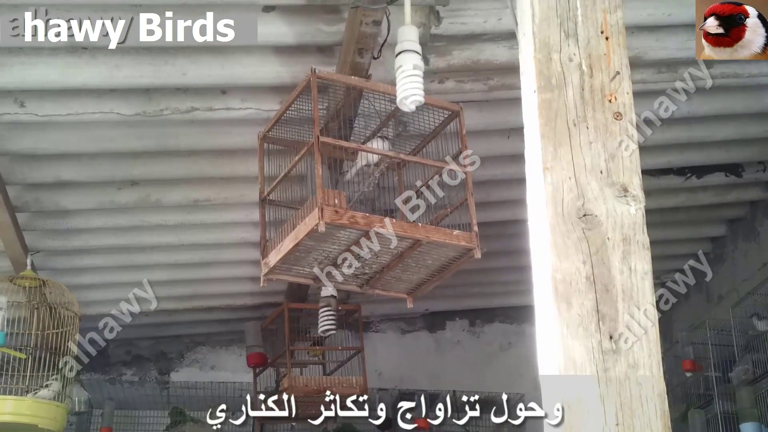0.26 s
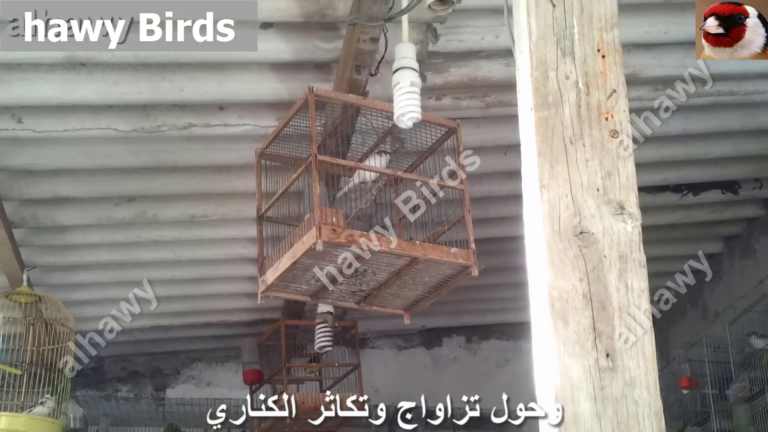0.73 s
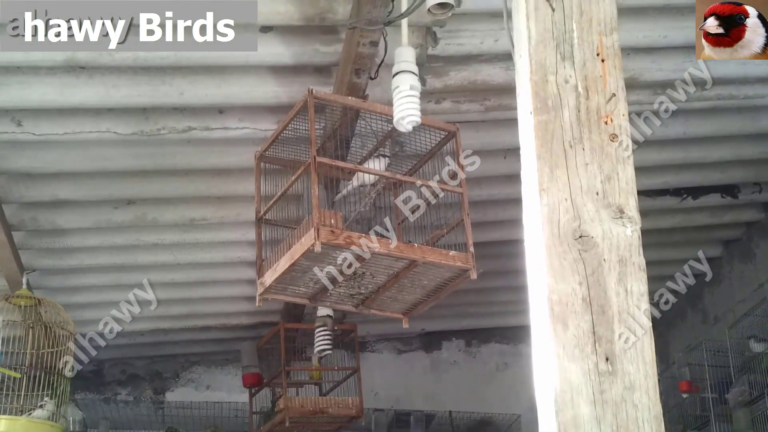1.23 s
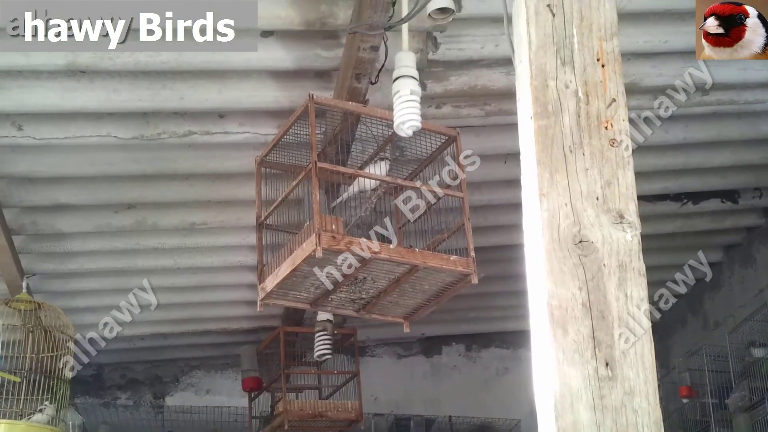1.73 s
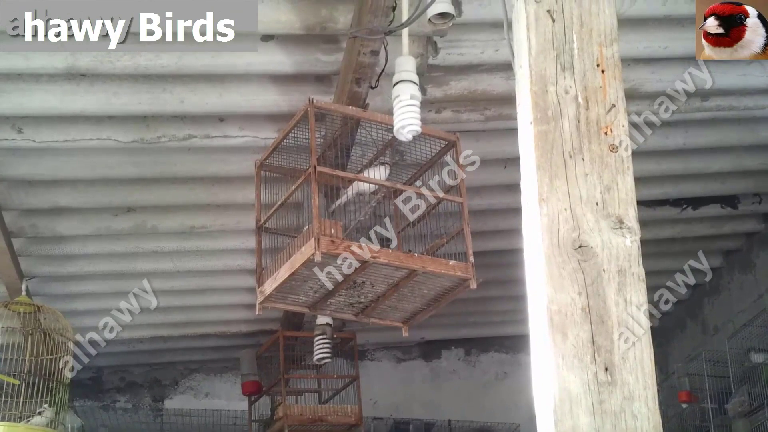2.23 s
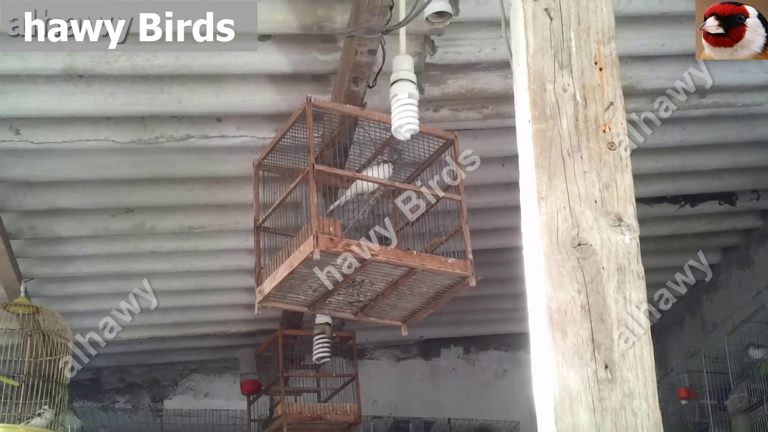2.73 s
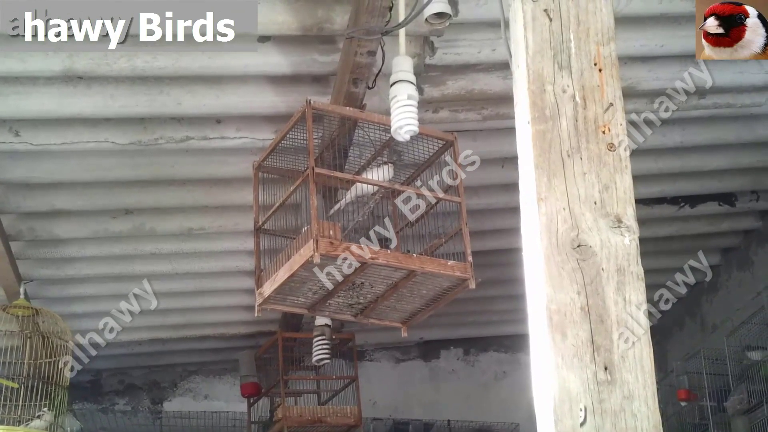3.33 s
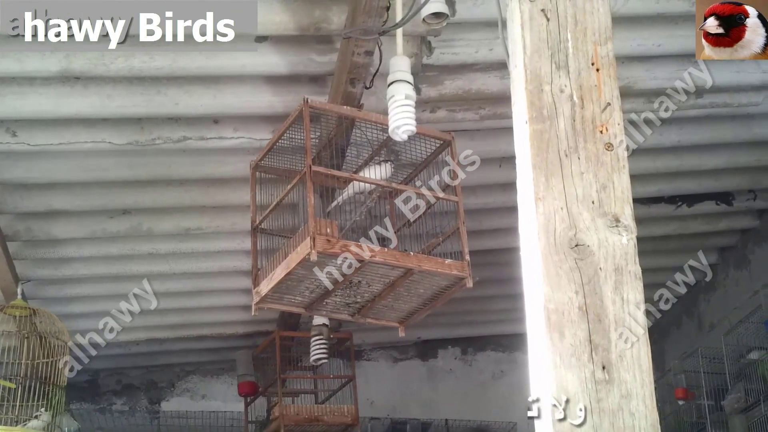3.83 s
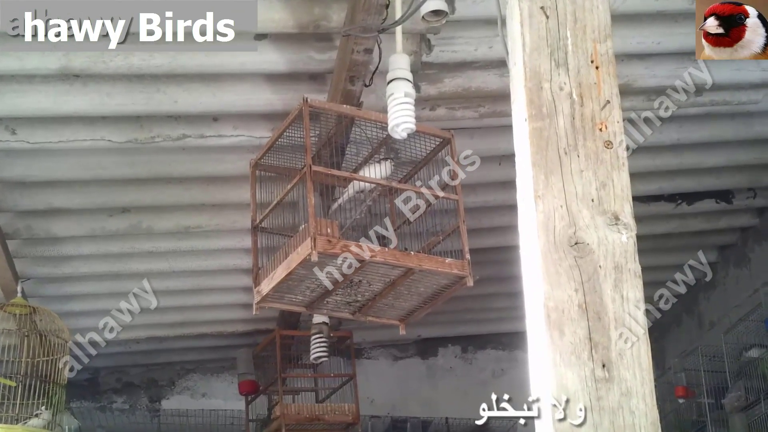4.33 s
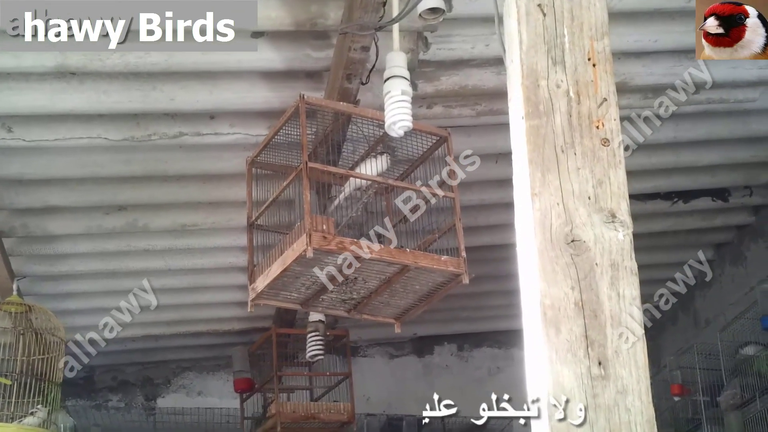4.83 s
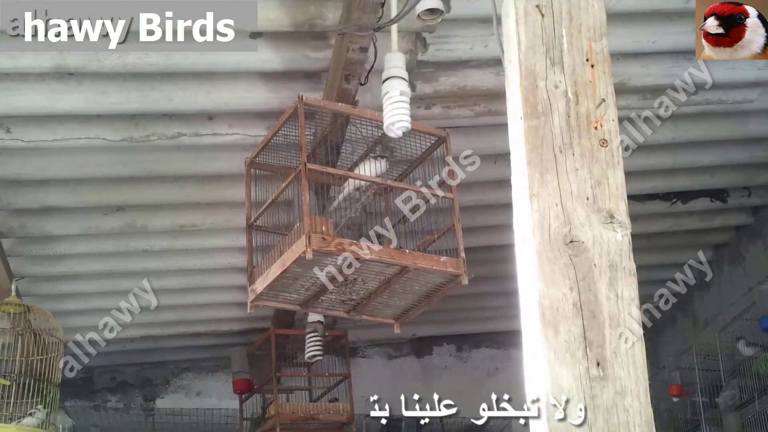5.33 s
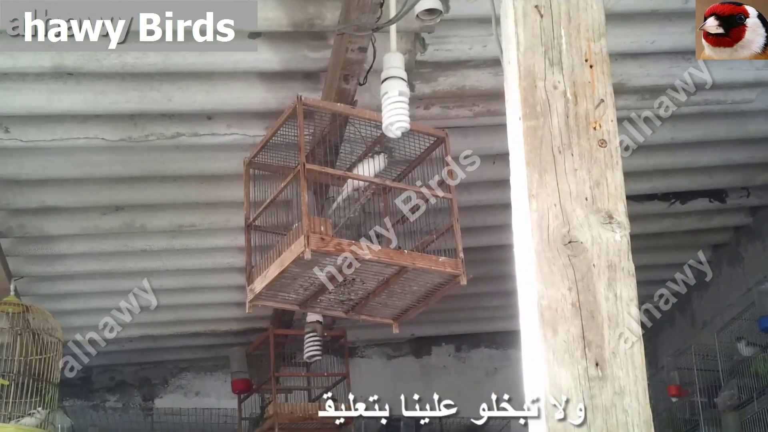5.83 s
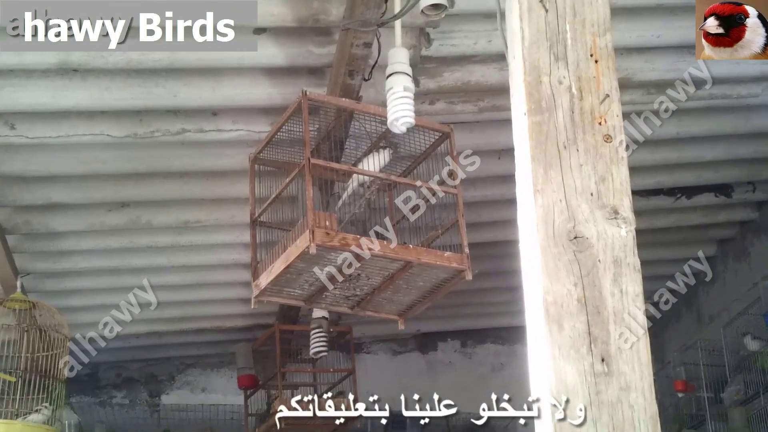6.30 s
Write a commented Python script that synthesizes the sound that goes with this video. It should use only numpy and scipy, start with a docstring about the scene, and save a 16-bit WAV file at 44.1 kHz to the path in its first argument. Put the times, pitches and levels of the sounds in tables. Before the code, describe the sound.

A caged canary sings rapid rolling trills, pauses, then builds to a loud long trill and bright whistles over low hum and faint distant chirps.

```python
"""Under a corrugated roof, a caged canary sings five trills, a run of falling notes and a few whistles.
Each syllable is a gliding, nearly pure tone; roof and posts add discrete echoes and a decaying tail.
Other birds chirp as one or two gliding tones, and noise bursts are their hops on the cage wire.
Coloured noise makes a swelling low hum, a wavering rumble and a faint flickering hiss."""
import sys
import numpy as np
from scipy import signal
from scipy.fft import rfft, irfft
from scipy.io import wavfile
from scipy.ndimage import uniform_filter1d

SR = 44100
rng = np.random.default_rng(int(sys.argv[2]) if len(sys.argv) > 2 else 0)


def materialize(psi):
    """Save the field psi as 16-bit PCM at rate SR to the path in sys.argv[1].

    A 1-D psi becomes a single channel; in a 2-D psi each row is a channel.
    """
    bounded = np.clip(np.atleast_2d(psi).T, -1, 1)
    quanta = np.round(bounded * 32767).astype(np.int16)
    wavfile.write(sys.argv[1], SR, quanta)


N = 289296  # samples


def undb(db):
    """Level law: 20 dB is a tenfold amplitude."""
    return 10 ** (np.asarray(db) / 20)


def sides(pan_db):
    """Intensity panning: left and right gains that differ by pan_db."""
    return undb(np.array([[pan_db], [-pan_db]]) / 2)


def add(track, s, sound):
    """Superposition: mix a sound in at s seconds, cut to the track."""
    i = round(s * SR)
    a, b = max(i, 0), min(i + sound.shape[-1], track.shape[-1])
    track[..., a:b] += sound[..., a - i:b - i]


def curve(points):
    """Linear interpolation of (seconds, value) rows over the whole scene."""
    return np.interp(np.arange(N) / SR, *np.transpose(points))


def walk(rate):
    """Slow random modulation: levels held 1 / rate s and slewed twice; spread near 1."""
    k = int(SR / rate)
    held = np.repeat(rng.standard_normal(200), k)[:N]
    return 1.3 * uniform_filter1d(uniform_filter1d(held, k), k)


def flutter(parts):
    """Random modulation: a gain near 1, shaken by low-passed noise, spreads noise around a tone."""
    gain = np.ones(N)
    for db, top_hz in parts:
        low_pass = signal.butter(2, top_hz, fs=SR, output="sos")
        shake = signal.sosfilt(low_pass, rng.standard_normal(N))
        gain = gain + undb(db) * shake / np.std(shake)
    return gain


# Likeness of the two channels in background noise. Each row: frequency in Hz, left-right correlation.
LIKENESS = [(30, .7), (70, .88), (180, .98), (350, .92), (600, .8), (1000, .4), (2000, .1), (4000, .02)]
LEFT_LAG_MS = .2


def noise(spectrum, db):
    """Partial coherence: coloured noise alike in the bass, unrelated in the treble, and later on the left."""
    hz = np.arange(1, N // 2 + 2) * SR / N
    colour_hz, colour_db = np.transpose(spectrum)
    gain = undb(np.interp(np.log(hz), np.log(colour_hz), colour_db, -200, -200))
    like_hz, like = np.transpose(LIKENESS)
    like = np.clip(np.interp(np.log(hz), np.log(like_hz), like), 0, 1)
    mid, side = rfft(rng.standard_normal((2, N))) * gain * np.sqrt([1 + like, 1 - like])
    lag = np.exp(-2j * np.pi * hz * LEFT_LAG_MS / 1000)
    out = irfft(np.array([(mid + side) * lag, mid - side]), N)
    return out * undb(db) / np.sqrt(np.mean(out.mean(axis=0) ** 2))


# Colour of the hiss. Each row: frequency in Hz, relative density in dB per Hz.
HISS = [(700, 0.5), (1100, 6), (2000, 1), (4200, 2.5), (6500, -5), (10000, -4.5), (14000, -4.5),
        (15500, -19.5)]
HISS_DB = -68.5  # before its flicker


def hiss():
    """Broadband noise: a faint hiss whose level flickers at random."""
    return noise(HISS, HISS_DB) * undb(0.6 * walk(10.0))


# Course of the rumble. Each row: time in seconds, level in dB before the waver.
RUMBLE = [(0, -75), (.6, -76), (.9, -81), (3.2, -79), (3.8, -72), (5.2, -75), (6.56, -74)]
# Colour of the rumble. Each row: frequency in Hz, relative density in dB per Hz.
RUMBLE_COLOUR = [(15, -16), (30, 2), (50, 0), (70, -8), (100, -35)]
RUMBLE_WAVER_DB = 2


def rumble():
    """Narrow-band noise: a deep rumble that rises, falls and wavers."""
    level_db = curve(RUMBLE) + RUMBLE_WAVER_DB * walk(2.9)
    return noise(RUMBLE_COLOUR, 0) * sides(1.7) * undb(level_db)


# Colour of the hum. Each row: frequency in Hz, relative density in dB per Hz.
HUM = [(45, -42), (65, -22.5), (100, -13.5), (140, -12), (180, -0.5), (224, 2.5), (374, -12.5), (432, -11),
       (550, -19), (654, -19), (856, -30.5), (1100, -41.5), (1430, -86), (2420, -120)]
# Slow swells of the hum. Each row: time in seconds, level in dB, relative level of its upper part in dB.
HUM_SWELL = [(0, -47.5, 2), (1, -42, -3.5), (2.2, -43, 2), (2.8, -41.5, -4.5), (3.2, -43, 1.5),
             (3.802, -42.5, -2.5), (5.702, -43, -4.5), (6.56, -44, -1.5)]
HUM_UPPER_HZ, HUM_PAN_DB = 330, 3


def hum():
    """Band splitting: low coloured noise, nearer the left, whose upper part swells on its own."""
    whole = noise(HUM, 0) * sides(HUM_PAN_DB)
    high_pass = signal.butter(2, HUM_UPPER_HZ, "high", fs=SR, output="sos")
    upper = signal.sosfiltfilt(high_pass, whole)
    times, level_db, upper_db = np.transpose(HUM_SWELL)
    upper_gain = undb(curve(np.transpose([times, upper_db])))
    return (whole - upper + upper * upper_gain) * undb(curve(np.transpose([times, level_db])))


# Hops and wing beats on the cage wire.
# Each row: start in seconds, length in seconds, level in dB before the band filter, centre in Hz.
RUSTLES = [(1.114, 0.0056, -47.5, 7000), (1.562, 0.033, -54, 9000), (1.9, 0.057, -48.5, 5230),
           (2.018, .0014, -66, 5000), (2.474, 0.026, -50.5, 8740), (6.456, 0.032, -48, 9000)]


def hops():
    """Impact noise: each hop or wing beat on the wire is a short burst of band-passed noise."""
    out, air = np.zeros((2, N)), rng.standard_normal(N)
    for s, length, db, hz in RUSTLES:
        size = int(length * SR)
        burst = air[int(s * SR):][:size] * np.hanning(size) ** .5
        edges_hz = [hz / 3, min(1.4 * hz, .45 * SR)]
        band = signal.butter(1, edges_hz, "band", fs=SR, output="sos")
        add(out, s, undb(db) * signal.sosfilt(band, burst))
    return out


OVERTONE_JITTER_TIMES = 3.5  # exponent on the pitch jitter, so the overtones waver more


def glide(length, start_hz, end_hz, bend, attack, overtones_db, warble_hz=0., throat_hz=0.,
          throat_width_hz=np.inf, release=0.2, jitter=None):
    """Source and filter: a syrinx tone slides towards end_hz; the throat favours pitches near its resonance."""
    u = np.arange(int(length * SR)) / (length * SR)  # share of the note elapsed
    hz = end_hz + (start_hz - end_hz) * np.exp(-u / bend)
    hz = hz + warble_hz * np.sin(2 * np.pi * 90 * length * u)  # 90 times a second
    jitter = 1 if jitter is None else jitter[:len(u)]
    phase = 2 * np.pi * np.cumsum(hz * jitter) / SR
    hoarse_phase = 2 * np.pi * np.cumsum(hz * jitter ** OVERTONE_JITTER_TIMES) / SR
    ramp = np.clip(np.minimum(u / attack, (1 - u) / release), 0, 1)
    swell = np.sin(np.pi / 2 * ramp) ** 2
    throat = 1 / np.sqrt(1 + ((hz - throat_hz) / throat_width_hz) ** 4)
    overtones = sum(undb(db) * np.sin(k * hoarse_phase) for k, db in enumerate(overtones_db, 2))
    return np.sqrt(2) * swell * (throat * np.sin(phase) + np.sqrt(throat) * overtones)


FLOCK_COUNT, FLOCK_DB, FLOCK_SPREAD_DB = 120, -78, 3  # spread either way
FLOCK_LOW_HZ, FLOCK_HIGH_HZ = 2540, 5160  # range of starting pitches


def flock():
    """Random scattering: peep rows for birds at the far end of the room, spread in time and pitch."""
    when, length, pitch, fall, level, pan = rng.random((FLOCK_COUNT, 6)).T
    hz = FLOCK_LOW_HZ + (FLOCK_HIGH_HZ - FLOCK_LOW_HZ) * pitch
    level_db = FLOCK_DB + FLOCK_SPREAD_DB * (2 * level - 1)
    rows = [when * N / SR, 0.0684 + 0.032 * length, hz, hz * (1 - 0.46 * fall), level_db, 6 * pan - 1]
    return np.transpose(rows).tolist()


# One neighbour's repeated falling chirp, with a second, higher tone.
# Each row: start in seconds, length in seconds, starting pitch in Hz, level in dB.
CHIRPS = [(-.02, 0.036, 6100, -50.5), (0.518, 0.049, 5890, -51.5), (1.127, 0.066, 6090, -49.5),
          (1.74, 0.065, 6080, -51), (2.498, 0.055, 6240, -47), (3.403, 0.075, 6050, -48.5),
          (5.617, 0.07, 6050, -47.5)]
CHIRP_FALL_HZ, CHIRP_PAN_DB = 537, 1  # fall from the start to the pitch it slides towards
CHIRP_UPPER_HZ, CHIRP_UPPER_DB = 827, -10.5  # higher tone, relative to the lower
# Single-tone peeps of the other birds. Each row: start in seconds, length in seconds, starting pitch in Hz,
# pitch it slides towards in Hz, level in dB, left minus right in dB.
PEEPS = [(0.136, 0.021, 5300, 5420, -57, 0), (0.22, 0.018, 2860, 3420, -58, 0),
         (0.948, 0.13, 1150, 1064, -65, -2), (1.033, 0.046, 4620, 3300, -65, -2),
         (1.229, 0.061, 5320, 4960, -57, 4), (1.2, 0.053, 3450, 3010, -67, 2),
         (2.156, 0.094, 5270, 3530, -64, 4), (1.504, 0.071, 2840, 2550, -71, 2),
         (2.404, 0.081, 4900, 4300, -71, -2), (4.338, 0.033, 4540, 4430, -57, 4),
         (2.247, 0.063, 2804, 2900, -59.5, 0), (4.104, 0.081, 4370, 4400, -60, 2),
         (4.224, 0.1, 5350, 5250, -52, 2), (4.661, 0.023, 4340, 6350, -48, 2),
         (5.754, 0.038, 4590, 4480, -51, 2), (5.812, 0.046, 4960, 5720, -51.5, 2),
         (6.398, 0.037, 5290, 5220, -51, 1), (6.454, 0.048, 6900, 6990, -53, 3),
         (6.463, 0.008, 6870, 3400, -36.5, 0)]
# Calls with a second, higher tone, in some near the octave. Each row: the columns of a peep, then the
# higher tone's distance above the lower in Hz and its relative level in dB.
TWO_TONE_CALLS = [(1.526, 0.089, 4430, 4360, -63.5, 4, 910, -9),
                  (1.848, 0.063, 4630, 4390, -57.5, 1, 4570, -12),
                  (3.489, 0.072, 4460, 4210, -54.5, 1, 4360, -6),
                  (2.197, 0.04, 4700, 4710, -63.5, 2, 600, 4),
                  (2.266, 0.02, 4740, 4570, -61.5, 2, 600, 3.5),
                  (2.657, 0.092, 4480, 4500, -61, 4, 652, -13),
                  (4.92, 0.13, 4340, 4110, -55, 0, 4120, -4.5),
                  (6.465, 0.045, 4930, 4100, -45.5, 3, 587, -9)]
# Random loudness shake that roughens the calls, fast to slow. Each row: share in dB, upper frequency in Hz.
FAR_FLUTTER = [(-20, 1500), (-7, 250)]


def neighbours():
    """Addition of tones: short warbling calls, some with a second, higher tone that glides alongside."""
    out = np.zeros((2, N))
    chirps = [(s, length, hz, hz - CHIRP_FALL_HZ, db, CHIRP_PAN_DB, CHIRP_UPPER_HZ, CHIRP_UPPER_DB)
              for s, length, hz, db in CHIRPS]
    for s, length, hz0, hz1, db, pan_db, *upper in chirps + TWO_TONE_CALLS + PEEPS + flock():
        call = glide(length, hz0, hz1, .6, 0.096, (), 120)
        if upper:
            above_hz, upper_db = upper
            higher_tone = glide(length, hz0 + above_hz, hz1 + above_hz, 0.62, 0.57, (), 160)
            call = call + undb(upper_db) * higher_tone
        add(out, s, undb(db) * sides(pan_db) * call)
    return out * flutter(FAR_FLUTTER)


# Single notes of the singer: short notes, a run of falling ones and whistles.
# Each row: start in seconds, length in seconds, starting pitch in Hz, pitch it slides towards in Hz,
# glide time as a share of the length, level in dB before the fade, warble in Hz.
SINGLE_NOTES = [(-.005, 0.018, 2540, 2310, 0.9, -32.5, 275), (0.712, 0.037, 2360, 1510, 0.92, -44, 120),
                (0.757, 0.068, 2464, 1330, 0.7, -45.5, 123), (0.807, 0.066, 2434, 1460, 0.78, -49, 120),
                (0.862, 0.04, 2193, 1392, 0.99, -52, 118), (0.91, 0.018, 2030, 1410, 0.81, -69, 62),
                (2.469, 0.0533, 1740, 3270, 0.16, -41.5, 85), (2.893, 0.027, 3720, 4060, 0.3, -76, 60),
                (6.296, 0.14, 2603, 2962, 0.24, -19.5, -12), (6.514, 0.16, 2475, 2988, 0.13, -17.5, 24)]
NOTE_FADE_DB_S = -100  # dB per second


def single_notes():
    """Frequency modulation: single gliding, warbling notes that fade exponentially."""
    out = np.zeros((2, N))
    for s, length, hz0, hz1, bend, db, warble_hz in SINGLE_NOTES:
        note = glide(length, hz0, hz1, bend, 0.27, (-38, -42), warble_hz)
        fading_db = db + NOTE_FADE_DB_S * np.arange(len(note)) / SR
        add(out, s, undb(fading_db) * sides(1.0) * note)
    return out


def syllable_times(first_s, last_s, first_ms, last_ms, count):
    """Cubic interpolation: onsets along the smooth tempo that joins both ends of a trill."""
    u = np.linspace(0, 1, count)
    tempo_bend = (count - 1) / 1000 * (first_ms * u * (1 - u) ** 2 - last_ms * u ** 2 * (1 - u))
    return first_s + (last_s - first_s) * u ** 2 * (3 - 2 * u) + tempo_bend


# Tempo of each trill. Each row: first syllable in seconds, last syllable in seconds,
# first period in ms, last period in ms.
TEMPO = [(0.024, 0.703, 49.4, 59.7), (2.52, 2.825, 44, 59), (2.97, 3.575, 25, 27),
         (3.646, 4.562, 37.77, 39.59), (4.6002, 6.1863, 37.9, 55.9)]
# Number of syllables in each trill.
SYLLABLE_COUNTS = [13, 7, 25, 25, 32]
# Syllable of each trill. Each row: starting pitch in Hz, pitch it slides towards in Hz, glide time as a
# share of the syllable, sung share of the period, attack share, release share, throat resonance in Hz,
# throat width in Hz, 2nd, 3rd and 4th harmonic in dB, left minus right in dB, extra level of every
# second syllable in dB, pitch rise over the trill in percent.
PHRASES = [(2965, 1850, .62, .66, 0.3, 0.41, 2675, 323, -27.5, -29, -35.5, 0, 1.5, 5),
           (4214, 2300, 1.1, 0.76, 0.15, 0.39, 3800, 330, -25, -27.5, -49, 2.5, 0.5, -1),
           (2470, 5240, 1.37, 0.18, 0.14, 0.2, 3380, 580, -24.5, -47, -52, 2, -1, 1.5),
           (2740, 3380, 0.478, 0.499, 0.065, 0.31, 3010, 280, -30, -35, -40, 1, 0.5, 1.5),
           (2751, 3340, 0.553, 0.519, 0.057, 0.27, 2640, 660, -30.5, -35, -49, 0.5, -0.5, 2.5)]
# Faint side note with each syllable of a trill. Each row: lead in seconds (negative is later), length in
# seconds, starting pitch in Hz, pitch it slides towards in Hz, level relative to the syllable in dB,
# its overtones in dB.
GRACE = [(-.03, 0.014, 2230, 1960, -20.5, -15), (-.022, 0.016, 3320, 2330, -21, -32),
         (-.002, 0.019, 6070, 6550, -23, -40), (.007, .010, 2230, 3130, -20, -15),
         (.008, 0.0091, 2018, 3090, -16.5, -22)]
# Effort of the singer. Each row: time in seconds, syllable level in dB before alternation and scatter.
EFFORT = [(0, -32), (.3, -29.5), (.65, -29.5), (.7, -33.5), (2.52, -39.5), (2.57, -33.5), (2.83, -41),
          (2.97, -50.5), (3.05, -46.5), (3.4, -41.5), (3.58, -42.5), (3.64, -33.5), (3.8, -31.5),
          (3.91, -24), (3.97, -27.5), (4.14, -27.5), (4.19, -32), (4.31, -24.5), (4.41, -29), (4.56, -31),
          (4.6, -28), (4.72, -24), (4.87, -25.5), (5.0, -22), (5.12, -24), (5.35, -22), (5.6, -23.5),
          (5.95, -22.5), (6.19, -24)]
TIMING_SCATTER_MS, LEVEL_SCATTER_DB = .7, 1.2
PITCH_JITTER_PERCENT, PITCH_JITTER_TOP_HZ = .8, 600


def trills():
    """Repetition with scatter: every syllable repeats its phrase's glide, a little off in pitch."""
    out = np.zeros((2, N))
    unsteady = flutter([(20 * np.log10(PITCH_JITTER_PERCENT / 100), PITCH_JITTER_TOP_HZ)])
    for tempo, count, phrase, grace in zip(TEMPO, SYLLABLE_COUNTS, PHRASES, GRACE):
        hz0, hz1, bend, share, attack, release, throat_hz, width_hz, *rest = phrase
        *overtones_db, pan_db, second_db, rise = rest
        lead_s, *grace_glide, grace_db, grace_overtones_db = grace
        starts = syllable_times(*tempo, count)
        periods = np.gradient(starts)
        chance = rng.standard_normal((count, 4))
        levels_db = np.interp(starts, *np.transpose(EFFORT)) + second_db * (np.arange(count) % 2)
        levels_db = levels_db + LEVEL_SCATTER_DB * chance[:, 2]
        pitches = 1 + rise / 100 * np.linspace(-.5, .5, count)
        for s, period, db, pitch, (a, b, _, late) in zip(starts, periods, levels_db, pitches, chance):
            jitter = unsteady[int(s * SR):]
            note = glide(share * period, (pitch + 0.012 * a) * hz0, (pitch + 0.008 * b) * hz1, bend, attack,
                         overtones_db, 0, pitch * throat_hz, width_hz, release, jitter)
            note = note / np.sqrt(share)  # a shorter sung share is made louder
            side_note = glide(*grace_glide, 0.97, 0.084, [grace_overtones_db] * 2, jitter=jitter)
            add(out, s - lead_s, undb(db + grace_db) * sides(pan_db) * side_note)
            add(out, s + late * TIMING_SCATTER_MS / 1000, undb(db) * sides(pan_db) * note)
    return out


# Random loudness shake that puts a soft haze around the song's tones, fast to slow.
# Each row: share in dB, upper frequency in Hz.
SINGER_FLUTTER = [(-33, 6500), (-32, 2800), (-24, 300)]
BEAK_LOW_HZ = 1370


def singer():
    """Radiation by a small source: the beak sends out little below the song's range."""
    song = (trills() + single_notes()) * flutter(SINGER_FLUTTER)
    beak = signal.butter(2, BEAK_LOW_HZ, "high", fs=SR, output="sos")
    return signal.sosfilt(beak, song)


ROOM_T60_S, ROOM_BUILD_S = 0.3, 0.0036  # decay by 60 dB, and onset of the tail
TAIL_DRIFT_RAD = .7  # spread of the random mixing angle


def room(x, tail_db, echoes, facing=1):
    """Reverberation: direct sound, hard echoes, then a dense tail mixed from two by a slow random drift."""
    t = np.arange(SR // 2) / SR
    envelope = undb(-60 * t / ROOM_T60_S) * np.clip(t / ROOM_BUILD_S, 0, 1)
    tails = rng.standard_normal((2, 2, len(t))) * envelope
    tails *= undb(tail_db) / np.sqrt(np.sum(tails ** 2, axis=2, keepdims=True))
    early = np.zeros((2, len(t)))
    early[:, 0] = 1
    for ear, taps in zip(early, echoes):
        for ms, db in taps:
            add(ear, 0, undb(db) * np.sinc((t - ms / 1000) * SR))  # allows delays between samples
    drift = TAIL_DRIFT_RAD * walk(4)
    paths = [(x * facing, early), (x * np.cos(drift), tails[0]), (x * np.sin(drift), tails[1])]
    heard = sum(signal.fftconvolve(sound, response, axes=1)[:, :N] for sound, response in paths)
    energy = np.sum(early ** 2, axis=1, keepdims=True) + undb(2 * tail_db)
    return heard / np.sqrt(energy)


# First echoes of the singer off roof and posts, a list for the left and one for the right.
# Each row: delay in ms, level relative to the direct sound in dB.
ECHOES = [
    [(1.82, -9), (3.16, -6), (6.1, -3), (10.3, -8), (13.5, -12), (17.56, -12)],
    [(2.3, -10), (4.42, -8), (6.9, -4), (11.5, -9), (15.48, -11), (20.5, -11)],
]
# Echoes from the farther cages, left list then right.
# Each row: delay in ms, level relative to the direct sound in dB.
FAR_ECHOES = [
    [(5.2, -10), (9.7, -0.5), (16.1, -17)],
    [(3.9, 5.5), (12.3, -14), (20.4, 3)],
]
# How far the beak points at the phone.
# Each row: time in seconds, gain of the direct sound and first echoes in dB.
FACING = [(0, -4.5), (.7, -5.5), (.76, 4.5), (2.5, -4.5), (3.0, -6.5), (3.6, -3.5), (3.9, -2), (6.56, -4.5)]
ROOM_DB, FAR_ROOM_DB = 2, 6  # tail energy relative to the direct sound, near and far


def scene():
    """Superposition of the background, the farther birds and the singer."""
    background = hum() + rumble() + hiss()
    far_birds = room(neighbours() + hops(), FAR_ROOM_DB, FAR_ECHOES)
    canary = room(singer(), ROOM_DB, ECHOES, undb(curve(FACING)))
    return background + far_birds + canary


GAIN_KNEE_DB, GAIN_RATIO, GAIN_TIME_S = -29.5, 1.3, 0.63
TOP_HZ = 14900


def record(dry):
    """Compression and band limiting: the phone eases its gain down under loud sound and cuts the top."""
    loudness = np.sqrt(uniform_filter1d(np.mean(dry ** 2, axis=0), int(GAIN_TIME_S * SR)))
    gain = np.minimum(undb(GAIN_KNEE_DB) / loudness, 1) ** (1 - 1 / GAIN_RATIO)
    low_pass = signal.ellip(10, .2, 80, TOP_HZ, fs=SR, output="sos")
    return signal.sosfilt(low_pass, dry * gain)


dry = scene()
out = record(dry)
materialize(out)
```